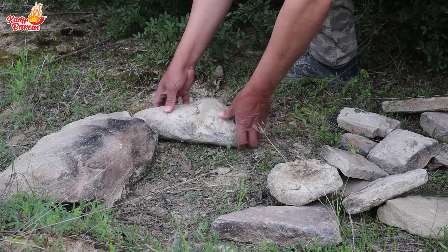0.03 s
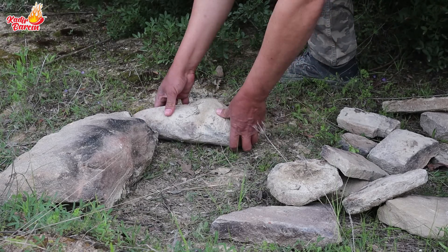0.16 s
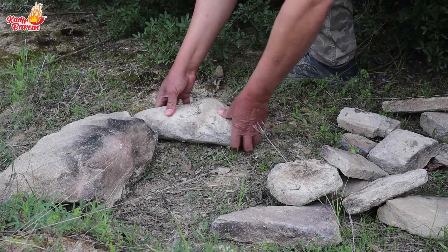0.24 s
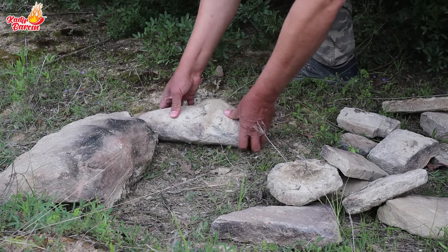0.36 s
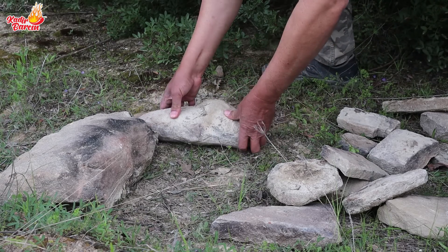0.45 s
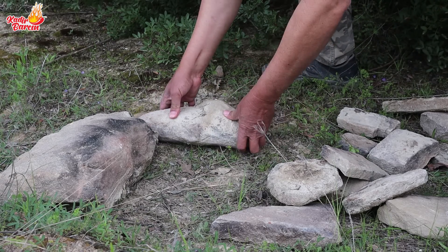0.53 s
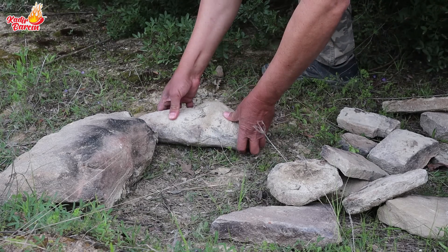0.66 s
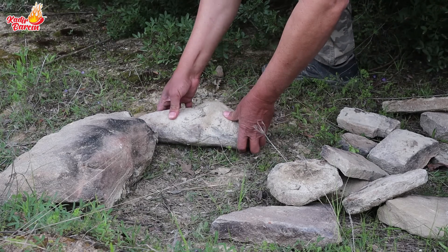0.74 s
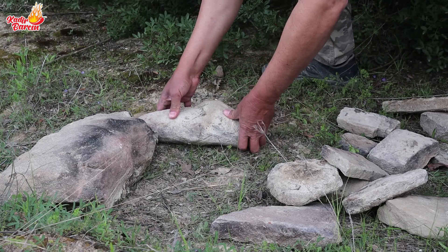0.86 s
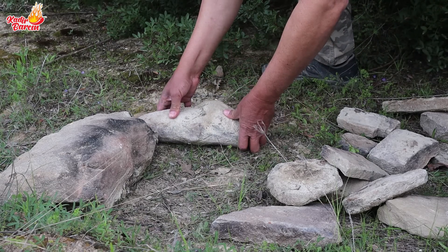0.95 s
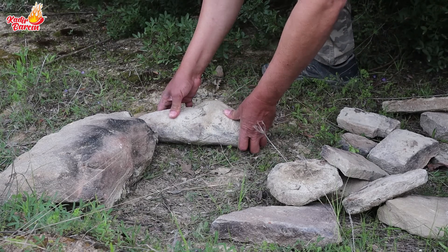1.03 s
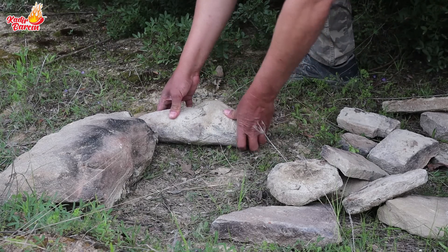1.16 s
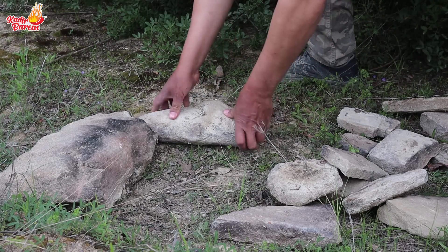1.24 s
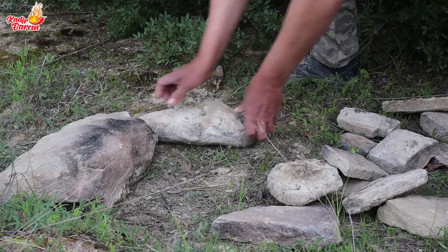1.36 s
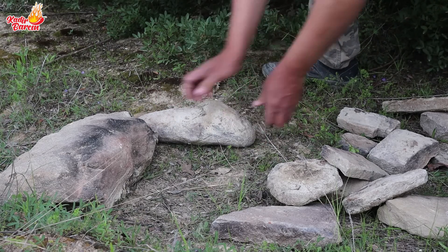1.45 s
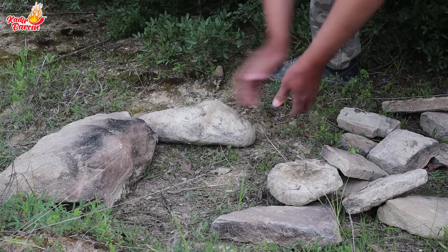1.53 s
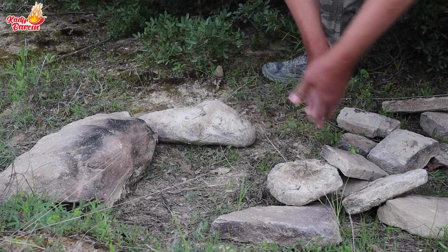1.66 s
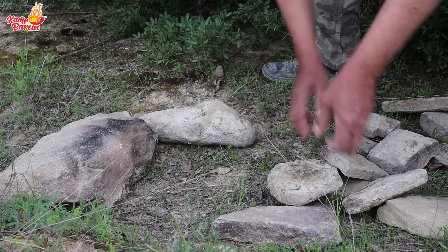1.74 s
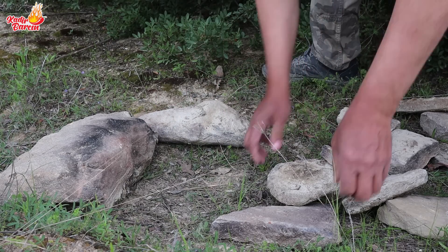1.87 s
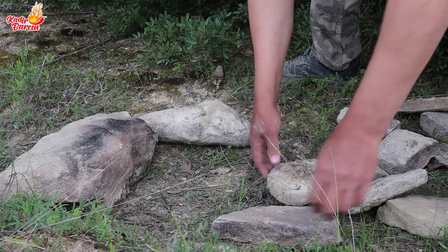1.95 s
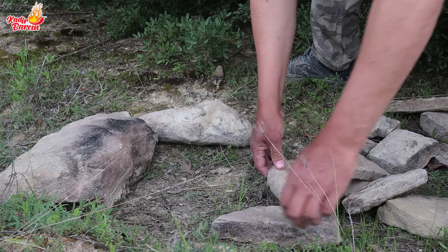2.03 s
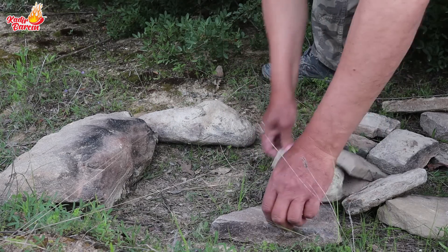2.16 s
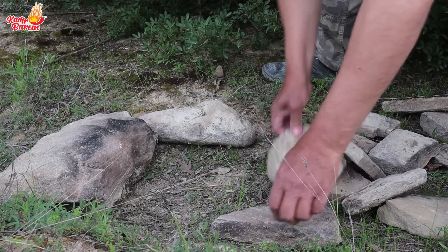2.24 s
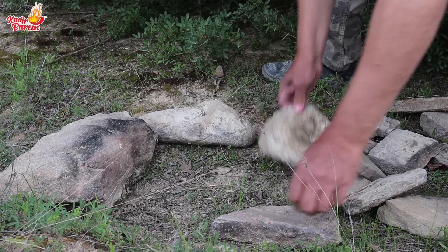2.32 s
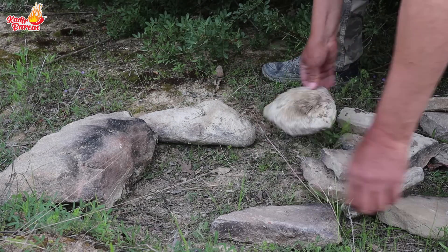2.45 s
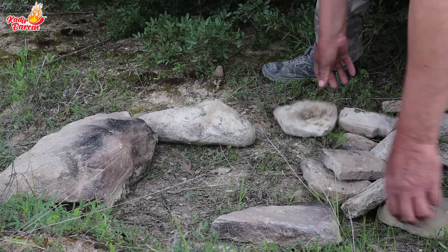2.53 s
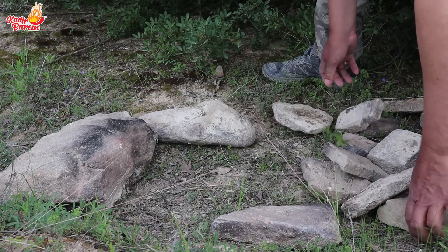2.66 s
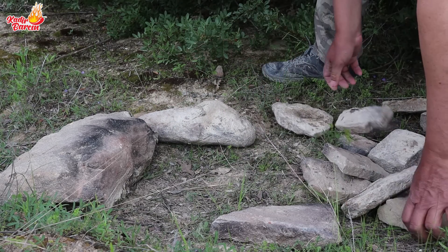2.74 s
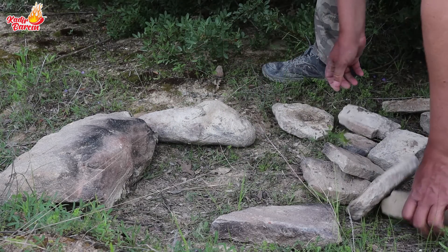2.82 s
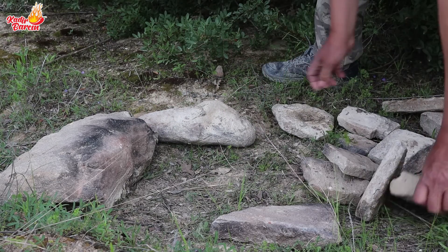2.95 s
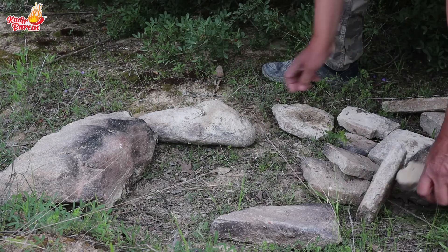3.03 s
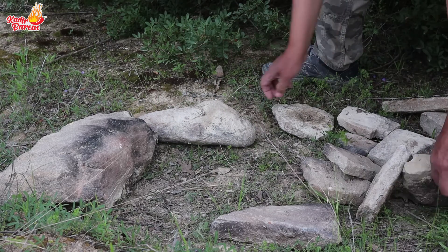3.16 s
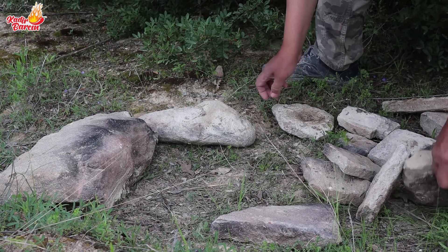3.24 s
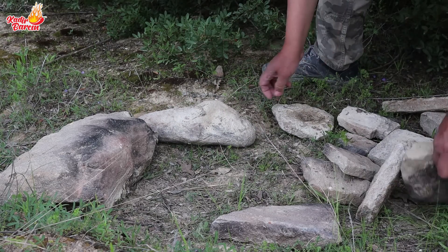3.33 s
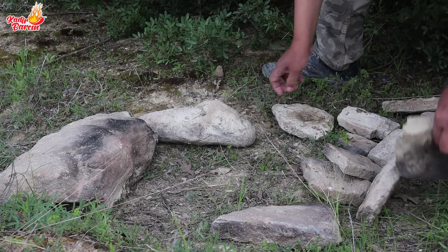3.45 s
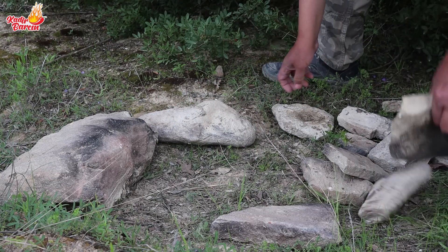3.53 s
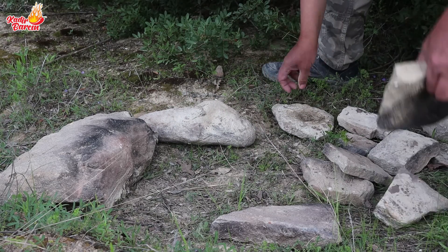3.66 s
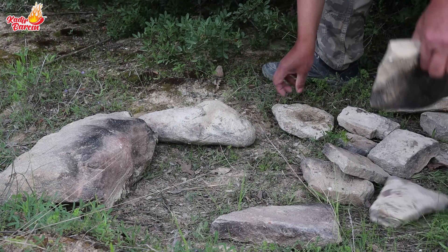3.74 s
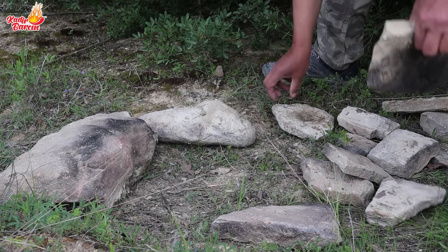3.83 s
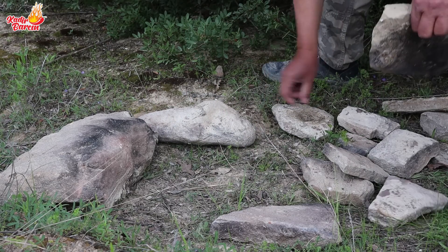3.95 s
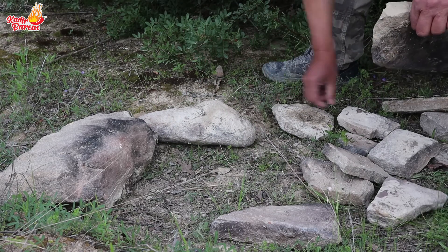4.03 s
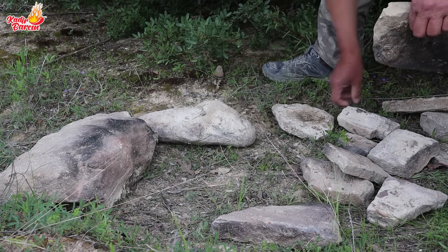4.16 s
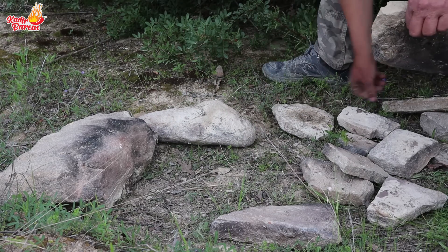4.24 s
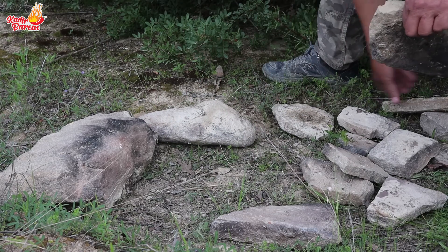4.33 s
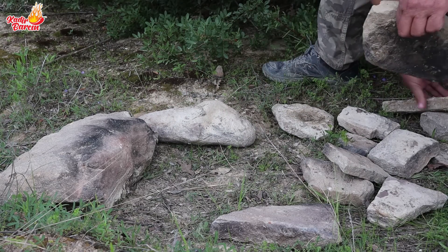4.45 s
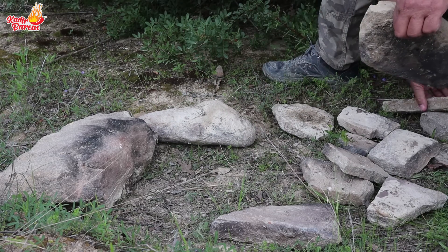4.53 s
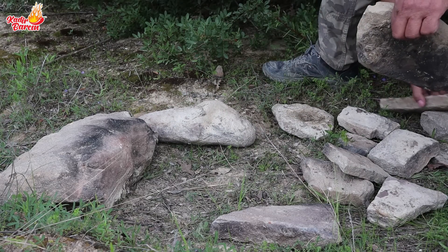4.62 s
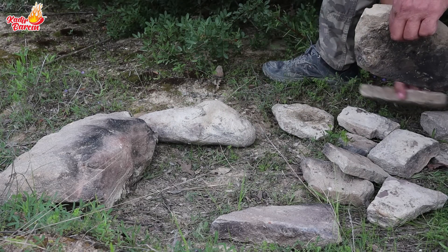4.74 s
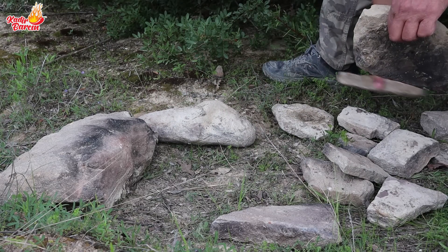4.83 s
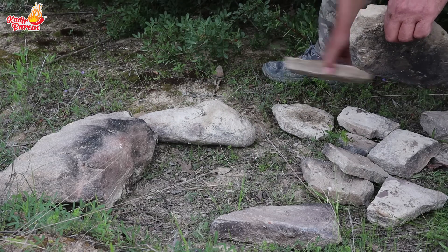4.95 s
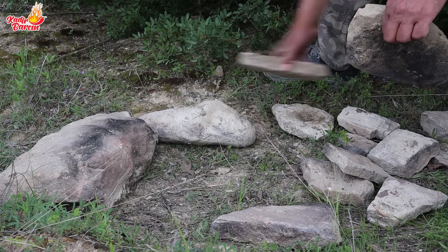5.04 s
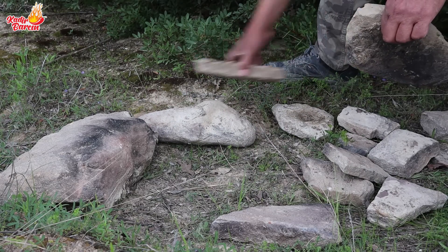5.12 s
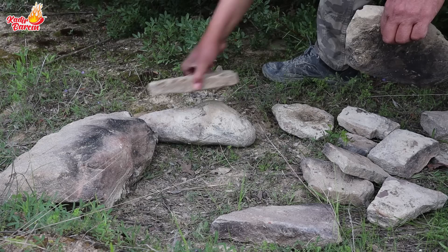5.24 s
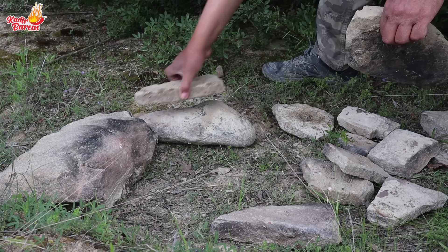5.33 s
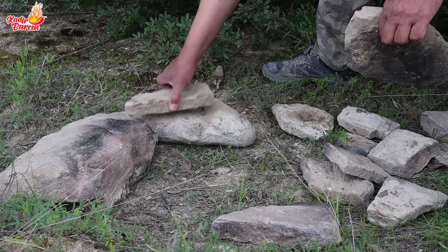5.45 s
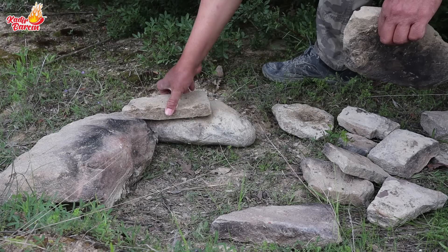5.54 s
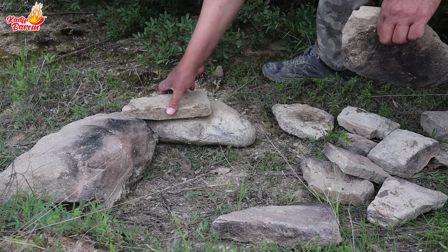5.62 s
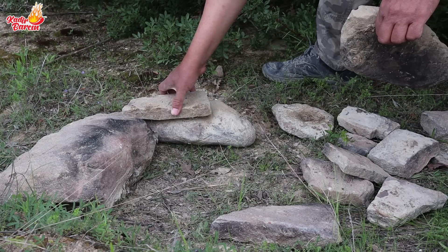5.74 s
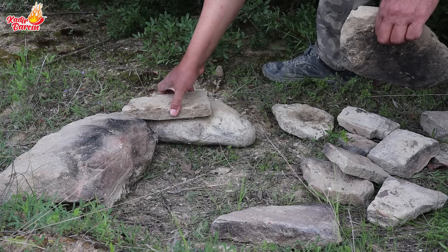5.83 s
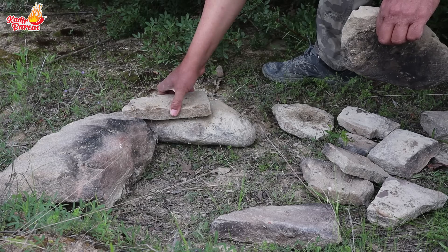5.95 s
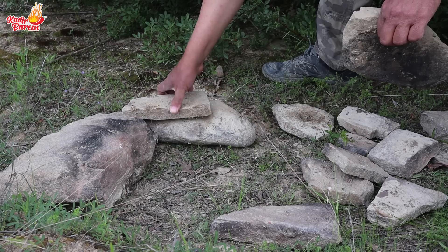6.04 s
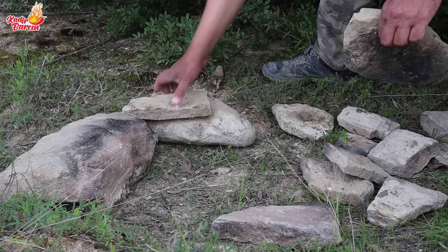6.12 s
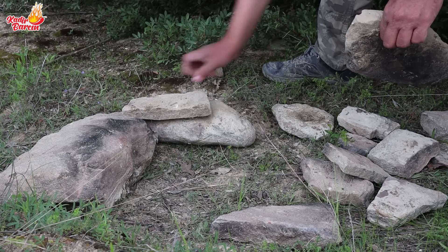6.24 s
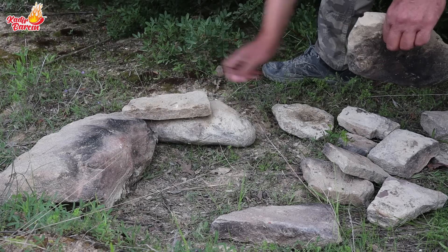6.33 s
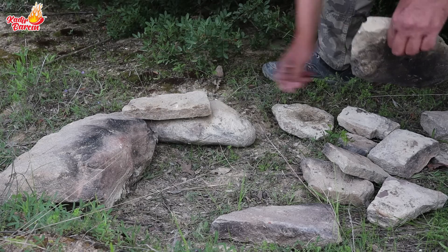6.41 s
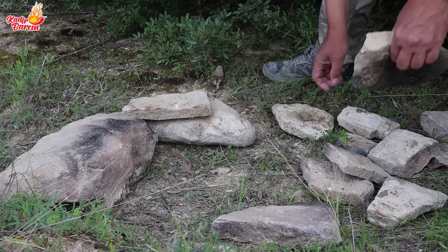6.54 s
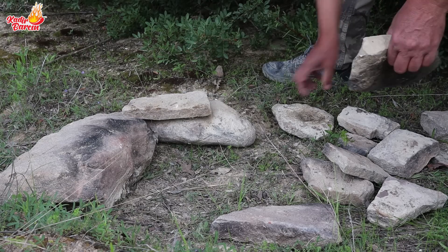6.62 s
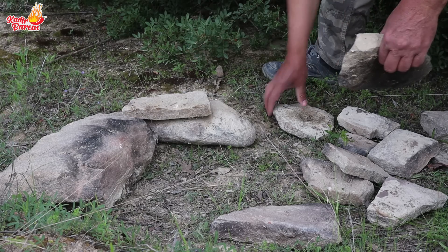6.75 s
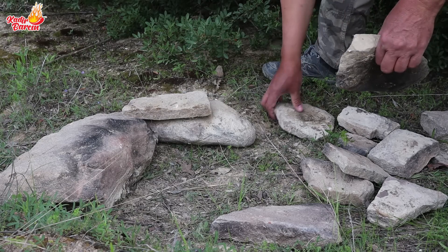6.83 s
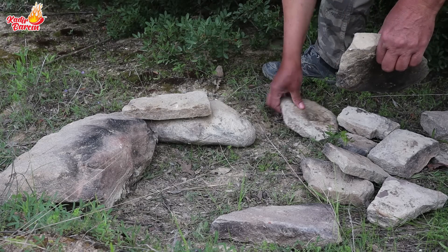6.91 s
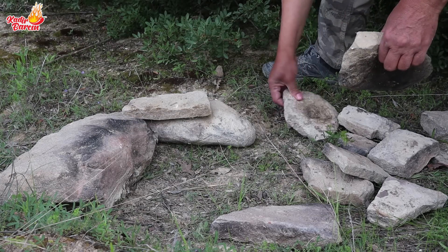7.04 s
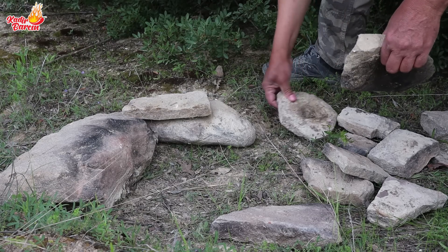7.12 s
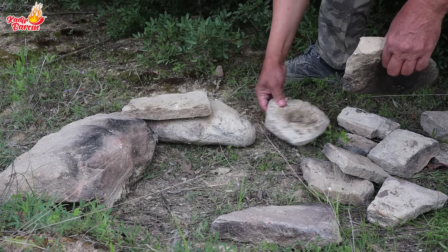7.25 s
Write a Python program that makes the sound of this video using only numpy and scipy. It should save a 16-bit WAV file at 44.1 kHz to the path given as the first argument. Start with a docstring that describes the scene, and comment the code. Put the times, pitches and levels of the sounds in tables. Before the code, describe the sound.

Close stone-on-stone knocks and short scrapes, with soft thumps on turf and light grass rustle, over quiet outdoor hiss.

```python
"""Flat stones are picked from a pile and stacked by hand on dry grass, close up and nearly mono.
Each contact jolts the stone into a short dull clack with a faint ring. Dragged stones grate as their
rough faces catch and slip, and heavy ones thump on the turf. Dry grass crackles and snaps under them,
and clothes swish as the worker reaches, over a quiet outdoor rumble and hiss."""
import sys
import numpy as np
from scipy import signal
from scipy.fft import rfft, irfft
from scipy.io import wavfile

SR = 44100
rng = np.random.default_rng(int(sys.argv[2]) if len(sys.argv) > 2 else 0)


def to_wav(s):
    """Save 16-bit WAV."""
    ch = np.atleast_2d(s).T  # columns
    pcm = np.round(np.clip(ch, -1, 1) * 32767)  # PCM
    wavfile.write(sys.argv[1], SR, pcm.astype(np.int16))


N = 321048
TIME = np.arange(N) / SR
SHORT = TIME[:SR // 3]   # time axis of a single event
CUTOFF_HZ = 16000

# Stone landing on stone. Each row: start in seconds, level in dB, clack centre in Hz, clack top in Hz,
# ring in dB against the clack, offset of the lighter touch in seconds (negative is early), stone.
STONE_KNOCKS = [ (.710, -16, 393, 1220, -34, .0075, "tile"), (1.016, -38.5, 400, 1510, -30, .041, "block"),
                (1.7012, -28.5, 1540, 1870, -16, -0.0091, "plate"),
                (2.2101, -15.5, 1110, 1600, -28, 0.0071, "cobble"),
                (2.4672, -22, 960, 1690, -27, -0.041, "shard"),
                (2.4873, -4.5, 1420, 1970, -28.5, 0.0059, "plate"),
                (2.668, -11.5, 500, 1280, -8, -0.006, "block"),
                (2.809, -31.5, 1200, 3000, -34, 0.0056, "block"),
                (2.833, -33, 790, 2600, -30, .005, "block"),
                (2.938, -18.5, 1260, 3020, -18, 0.014, "wedge"),
                (2.946, -15.5, 940, 2480, -14.5, -0.0096, "tile"),
                (2.994, -26, 1010, 2000, -30, 0.0059, "wedge"), (3, -25.5, 1180, 3000, -24, -.003, "wedge"),
                (3.487, -36, 700, 1500, -20, -0.016, "wedge"),
                (3.527, -15, 790, 1640, -17.5, 0.0082, "wedge"),
                (4.064, -31, 1260, 1540, -34, 0.018, "block"),
                (5.6465, 0.5, 1700, 3200, -14, -.0085, "slab"),
                (6.748, -38.5, 1100, 1600, -33, .003, "dish"), (7.1735, -34, 815, 3030, -6, 0.017, "dish"),
                ]


def knocks():
    """Uneven faces touch twice: a main hit, and a lighter, duller one as the stone tips or rocks back."""
    lighter_db, lighter_pitch = -15, 0.54
    out = np.zeros(N)
    for start, db, centre_hz, top_hz, ring_db, offset_s, stone in STONE_KNOCKS:
        add(out, start, from_db(db) * touch(centre_hz, top_hz, ring_db, stone))
        lighter = touch(lighter_pitch * centre_hz, np.sqrt(lighter_pitch) * top_hz, ring_db, stone)
        add(out, start + offset_s, from_db(db + lighter_db) * lighter)
    return out


def touch(centre_hz, top_hz, ring_db, stone):
    """A jolted stone radiates one short wave and recoils more slowly as a whole; its modes ring on."""
    click = signal.unit_impulse(len(SHORT))
    wave = peak_one(low_pass(resonance(click, centre_hz, q=1.73), top_hz, order=6))
    recoil = peak_one(low_pass(resonance(click, 0.42 * centre_hz, q=1.2), top_hz, order=6))
    # grit breaks while the faces press together
    crush = rng.standard_normal(len(SHORT)) * stroke(SHORT, 0.0034, rise=0.2, fall=0.71)
    crush = peak_one(low_pass(resonance(crush, centre_hz, q=0.98), 9500, order=2))
    clack = wave + from_db(-13.5) * recoil + from_db(-20) * crush
    clack = scatter(clack, level_db=-9.0, t60=0.019, delay_s=.0012)   # off the ground and nearby stones
    sound = clack + from_db(ring_db) * stone_ring(stone, uneven_db=0.2)
    return scatter(sound, level_db=-33.5, t60=0.089, delay_s=0.018)   # the bushes answer faintly


# The voice of each stone, one row a mode. Each row: pitch in Hz, level in dB, 60 dB decay in seconds.
STONE_MODES = { "slab": [(740, -2, 0.019), (1267, -14, 0.041), (2170, -1, 0.04), (3120, -3, 0.035),
               (4480, -24, .03), (5840, -22, 0.034)], "dish": [(2628, 2.5, 0.04), (3530, -5.5, 0.023),
               (4400, -5, 0.016), (5766, -15, .018), (8250, -8.5, 0.016)], "cobble": [(1650, -13, 0.036),
               (2424, 2, 0.037), (3580, -4, 0.027), (4050, -7.5, 0.088), (4480, -0.5, 0.017),
               (4760, -9, 0.02), (7850, -1, 0.011)], "plate": [(3270, 9.5, 0.018), (3520, 1, 0.044),
               (6800, -9, .03), (7800, -5.5, 0.045)], "tile": [(836, -11, .045), (2110, -19, 0.018),
               (4100, 0, 0.041), (5700, -12, .03)], "shard": [(3930, 0, 0.13), (4900, -22, .06)],
               "wedge": [(630, 1.5, 0.039), (2125, -2, 0.086), (2984, -3, 0.072), (3380, -11, 0.084),
               (4710, 0, 0.024), (5997, -20, .07), (7650, -14, 0.069)], "block": [(850, 6, 0.023),
               (2510, -3.5, 0.025), (3450, 7, 0.011), (4160, -16, 0.064), (5870, -31, 0.019)], }


def stone_ring(stone, uneven_db):
    """A stone's modes ring briefly; their strengths vary by chance with where it is touched."""
    return sum(from_db(db + uneven_db * rng.standard_normal()) * damped(hz, t60)
               for hz, db, t60 in STONE_MODES[stone])


# How readily a stone sings when dragged. Each entry: stone, ring in dB against the grit.
DRAG_RING_DB = {"block": -13.5, "wedge": -7, "cobble": 2.5, "shard": 8, "dish": 9}
# One stone dragged over another. Each row: start in seconds, stroke length in seconds,
# grit level in dB, grit centre in Hz, stone.
STONE_DRAGS = [ (0, 0.024, -38.5, 900, "block"), (0.106, .07, -54.5, 1090, "block"),
               (0.686, 0.056, -53.5, 1520, "block"), (1.0, 0.46, -60, 443, "block"),
               (2.225, .11, -47.5, 900, "cobble"), (2.292, 0.096, -42.5, 1700, "cobble"),
               (2.393, 0.032, -46, 1410, "shard"), (2.457, .009, -46.5, 2500, "dish"),
               (2.66, 0.029, -30, 2400, "block"), (3.023, 0.04, -44, 1040, "wedge"),
               (3.16, 0.34, -44.5, 570, "wedge"), (3.411, 0.37, -53, 580, "wedge"),
               (3.675, .04, -42.5, 2300, "wedge"), (3.73, 0.072, -46, 1280, "block"),
               (4.542, 0.14, -58.5, 1800, "block"), (6.87, 0.28, -63, 1190, "dish"),
               (7.08, 0.016, -54, 3600, "dish"), (7.187, 0.049, -49, 2600, "dish"),
               (7.25, 0.016, -46, 3200, "dish"), ]


def scrapes():
    """Rough faces catch and slip in tiny jolts that rasp and ring the stone, for up to 1/3 s a drag."""
    out = np.zeros(N)
    for start, length, grit_db, grit_hz, stone in STONE_DRAGS:
        catches = from_db(3.7 * drift(247) + 2.0 * drift(79))[:len(SHORT)]
        slips = grains(per_s=5700, spread_db=3.5, size=len(SHORT)) * catches
        pressure = stroke(SHORT, length, rise=0.083, fall=1.7)
        slips = slips / rms(slips) * pressure
        grit = low_pass(resonance(slips, grit_hz, q=0.87), 4 * grit_hz, order=2)
        ring = signal.fftconvolve(slips, stone_ring(stone, uneven_db=1.5))[:len(SHORT)]
        rasp = grit / rms(grit) + from_db(DRAG_RING_DB[stone]) * ring / rms(ring)
        add(out, start, from_db(grit_db) * rms(pressure) * rasp)
    return out


# Weight landing on turf. Each row: start in seconds, level in dB, pitch in Hz, 60 dB decay in seconds.
TURF_THUMPS = [(0, -18, 128, 0.029), (0.7086, -25, 270, 0.028), (1.7, -41, 177, 0.03),
               (2.6682, -14.5, 192, 0.027), (2.706, -25.5, 179, 0.033), (2.946, -34.5, 169, 0.039),
               (3.746, -41, 174, 0.028), (3.885, -43, 164, .055), (5.647, -32.5, 189, .13)]


def thumps():
    """Soft turf and the stone's weight swing for a few cycles; the ground sways on, lower and longer."""
    out = np.zeros(N)
    for start, db, hz, t60 in TURF_THUMPS:
        sway = from_db(-18) * swing(0.55 * hz, t60=0.23)
        soil = low_pass(rng.standard_normal(len(SHORT)), 110, order=2) * decay(t60=0.5)
        add(out, start, from_db(db) * (swing(hz, t60) + sway + from_db(-25) * peak_one(soil)))
    return out


def swing(hz, t60):
    """A weight bobbing on soft ground; peak 1."""
    return peak_one(resonance(damped(hz, t60), 1.65 * hz, q=0.66))


# The tone of crackling grass. Each row: frequency in Hz, relative level in dB.
CRACKLE_SPECTRUM = [(300, -6), (1000, 0), (2000, -0.5), (3500, 2), (6200, -3.5), (8600, 3.5), (10500, -9),
                    (14000, -3.5), (16000, -23)]


def grass():
    """Stirred dry blades crackle in clumps, each size at its own pitch."""
    blades = sum(resonance(grains(per_s=450, spread_db=3.0, size=N), hz, q=hz / 2200)
                 for hz in np.linspace(1500, 15000, num=8))
    clumps = from_db(6.1 * drift(70))
    return from_db(3.5) * stirring() * colour(blades * clumps, CRACKLE_SPECTRUM)


# Hands, feet and stones stirring the grass, as a fader curve. Each row: time in seconds, level in dB.
STIR_CURVE = [(0.0, -59.5), (0.36, -61), (0.67, -62), (2.21, -62), (2.39, -52.5), (2.49, -57),
              (2.78, -54.5), (2.92, -55.5), (3.93, -59.5), (4.03, -61), (5.92, -63), (6.93, -61),
              (7.16, -56.5), (7.28, -57.5)]


def stirring():
    """How strongly the grass is moved; at or below its resting level it is silent."""
    rest_db = -62.5
    times, db = np.transpose(STIR_CURVE)
    level = from_db(np.interp(TIME, times, db))
    return np.sqrt(np.maximum(level ** 2 - from_db(rest_db) ** 2, 0))


# The tone of brushed grit and blades. Each row: frequency in Hz, relative level in dB.
BRUSH_SPECTRUM = [(300, 3.5), (1200, -6.5), (2500, -0.5), (5000, 0), (8600, 6.5), (10500, -3.5),
                  (14000, 2.5), (16000, 0)]
# Brisk brushes over the ground. Each row: start in seconds, length in seconds, level in dB.
BRUSH_STROKES = [(0, .045, -42.5), (1.692, 0.1, -39.5), (2.66, 0.02, -39), (2.68, 0.1, -45.5),
                 (2.912, 0.024, -41.5), (2.935, 0.045, -44), (3.712, 0.065, -44.5), (4.718, 0.07, -46),
                 (7.0, 0.15, -51)]


def brushes():
    """A brisk brush through grit and dry blades merges their clicks into a hiss."""
    hiss = colour(grains(per_s=14000, spread_db=-1.0, size=N), BRUSH_SPECTRUM)
    return strokes(BRUSH_STROKES, rise=0.1) * hiss


# The loudest dry stalks snapping. Each row: start in seconds, peak level in dB, tick centre in Hz.
STALK_SNAPS = [(.511, -32.5, 7000), (1.691, -31, 5040), (2.170, -28.5, 11000), (2.368, -29.5, 8950),
               (3.134, -22.5, 7550), (3.742, -22.5, 8600), (3.890, -21, 11600), (6.9655, -28, 8400),
               (7.083, -30.5, 9000)]


def snaps():
    """A few stalks break loudly; lesser ones break at random, more often the harder the grass stirs."""
    small_breaks = grains(per_s=16 * peak_one(stirring()) ** 2, spread_db=0.0, size=N)
    out = from_db(-36) * signal.fftconvolve(small_breaks, tick(hz=9300))[:N]
    for start, db, hz in STALK_SNAPS:
        add(out, start, from_db(db) * tick(hz))
    return out


def tick(hz):
    """A stalk breaks with one bright tick and a few splinters; peak 1."""
    crack = resonance(signal.unit_impulse(len(SHORT)), hz, q=2.1)
    return peak_one(scatter(crack, level_db=-0.5, t60=0.011, delay_s=.0002))


# The tone of sliding fabric. Each row: frequency in Hz, relative level in dB.
CLOTH_SPECTRUM = [(300, -4), (1100, 6), (3000, -0.5), (6000, 1), (8600, -1.5), (11000, -7.5), (16000, -11)]
# Soft swishes as the worker leans and reaches. Each row: start in seconds, length in seconds, level in dB.
CLOTH_SWISHES = [(.38, .16, -51.5), (2.52, 0.12, -48.5), (3.11, 0.24, -51.5), (3.82, 0.32, -51),
                 (6.44, .32, -52.5)]


def clothes():
    """Fabric slides with a fine, even grain."""
    friction = colour(grains(per_s=16000, spread_db=2.5, size=N), CLOTH_SPECTRUM)
    return strokes(CLOTH_SWISHES, rise=0.36) * friction


# The tone of the outdoor bed. Each row: frequency in Hz, relative level in dB.
AIR_SPECTRUM = [(13, -65), (22, -15), (64, -6), (97, -1.5), (135, -10), (248, -10.5), (277, -13),
                (345, -12), (442, -12.5), (855, -16), (928, -14.5), (1950, -19.5), (2570, -22),
                (7730, -25.5), (15800, -28)]


def outdoor_air():
    """Far rumble and even hiss, wavering a little."""
    return from_db(-55 + 0.62 * drift(6)) * colour(rng.standard_normal(N), AIR_SPECTRUM)


# The tone of the hiss that adds a trace of width. Each row: frequency in Hz, relative level in dB.
SIDE_SPECTRUM = [(30, -46), (70, -27), (300, 5), (1400, -10), (5000, -4.5), (14000, -2)]


def side_hiss():
    """A very faint hiss, opposite in polarity on the left and right."""
    return from_db(-72.5) * colour(rng.standard_normal(N), SIDE_SPECTRUM) * np.array([[1], [-1]])


def from_db(db):
    """Decibels to gain."""
    return 10 ** (np.asarray(db) / 20)


def rms(x):
    """Root mean square."""
    return np.sqrt(np.mean(x ** 2) + 1e-20)


def peak_one(x):
    """Scale to a peak of 1."""
    return x / np.abs(x).max()


def add(out, start_s, sound):
    """Mix a sound in at its start time."""
    start = int(np.clip(round(start_s * SR), 0, N - 1))
    out[start:start + len(sound)] += sound[:N - start]


def low_pass(x, hz, order):
    """Butterworth low-pass."""
    return signal.sosfilt(signal.butter(order, min(hz, SR / 2 - 1000), fs=SR, output="sos"), x + 1e-18)


def resonance(x, hz, q):
    """One broad band-pass."""
    hz = min(hz, CUTOFF_HZ)
    return signal.lfilter(*signal.iirpeak(hz, max(q, 3 * hz / SR), fs=SR), x + 1e-18)


def colour(x, spectrum):
    """Give a steady sound a spectrum; rms 1."""
    hz, db = np.transpose(spectrum)
    gain = from_db(np.interp(np.log(np.fft.rfftfreq(N, 1 / SR) + 1), np.log(hz), db))
    shaped = irfft(rfft(x) * gain, N)
    return shaped / rms(shaped)


def drift(per_s):
    """A random wander through per_s new values a second, with a spread near 1."""
    return np.interp(TIME * per_s, np.arange(2000), rng.standard_normal(2000))


def grains(per_s, spread_db, size):
    """Random clicks of uneven strength."""
    strength = from_db(spread_db * np.minimum(rng.exponential(1, size), 4))
    return (rng.random(size) < per_s / SR) * strength * rng.choice([-1, 1], size)


def decay(t60):
    """A fade that falls 60 dB in t60 seconds."""
    return from_db(-60 * SHORT / t60)


def damped(hz, t60):
    """A dying sine."""
    return np.sin(2 * np.pi * hz * SHORT) * decay(t60)


def stroke(t, length, rise, fall):
    """Pressure builds over the share `rise` of a stroke, then eases off with the exponent `fall`."""
    hardest = length * np.clip(rise, .02, .95)
    return np.clip(t / hardest, 0, 1) * np.clip((length - t) / (length - hardest), 0, 1) ** fall


def strokes(rows, rise):
    """Loudness over time of a table of strokes."""
    return sum(from_db(db) * stroke(TIME - start, length, rise, fall=0.75) for start, length, db in rows)


def scatter(x, level_db, t60, delay_s):
    """Follow a sound with a short dense cloud of echoes."""
    cloud = rng.standard_normal(len(SHORT)) * decay(t60) * (SHORT > delay_s)
    echoes = signal.fftconvolve(x, cloud)[:len(x)]
    return x + from_db(level_db) * echoes * rms(x) / rms(echoes)


def scene():
    """Everything sits in the middle; only a trace of hiss differs between the sides."""
    middle = knocks() + thumps() + scrapes() + grass() + brushes() + clothes() + snaps() + outdoor_air()
    return middle + side_hiss()


def record(dry):
    """Full scale limits the hardest knock; a steep low-pass cuts the very top."""
    top_cut = signal.ellip(10, .1, 70, CUTOFF_HZ, fs=SR, output="sos")
    return signal.sosfilt(top_cut, np.clip(dry, -1, 1))


dry = scene()
out = record(dry)
to_wav(out)
```